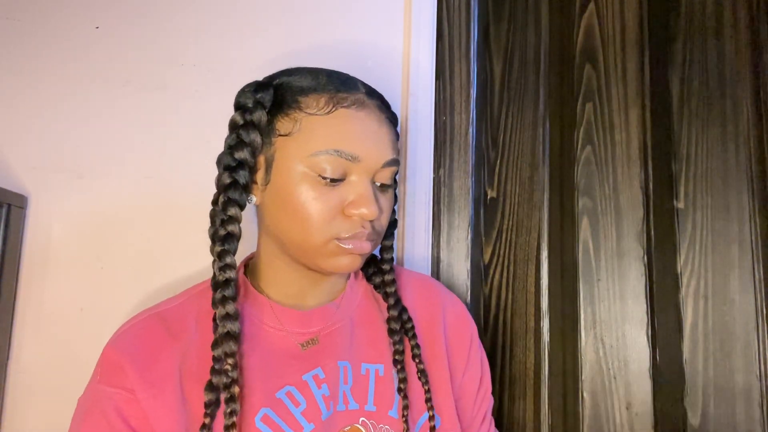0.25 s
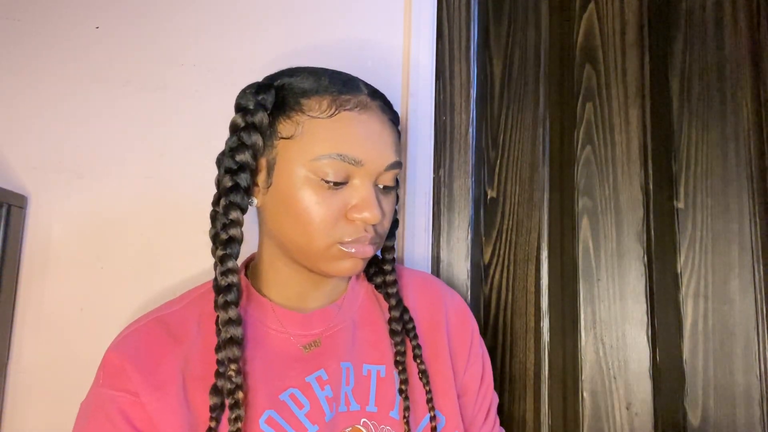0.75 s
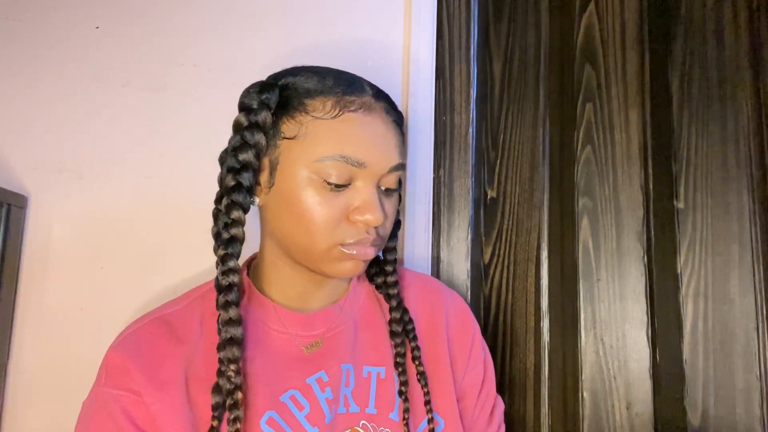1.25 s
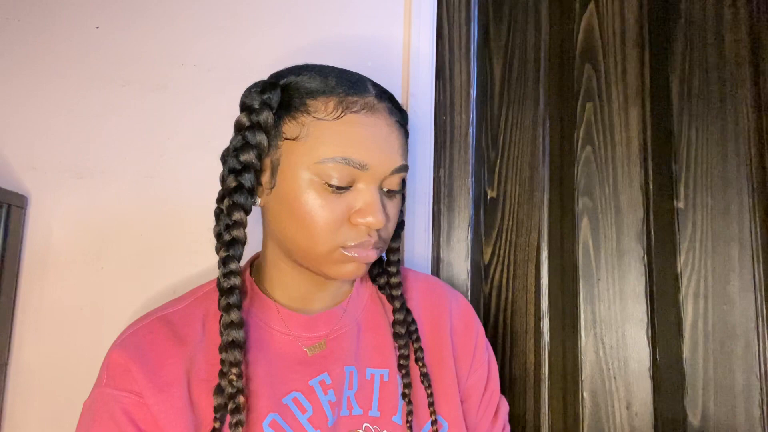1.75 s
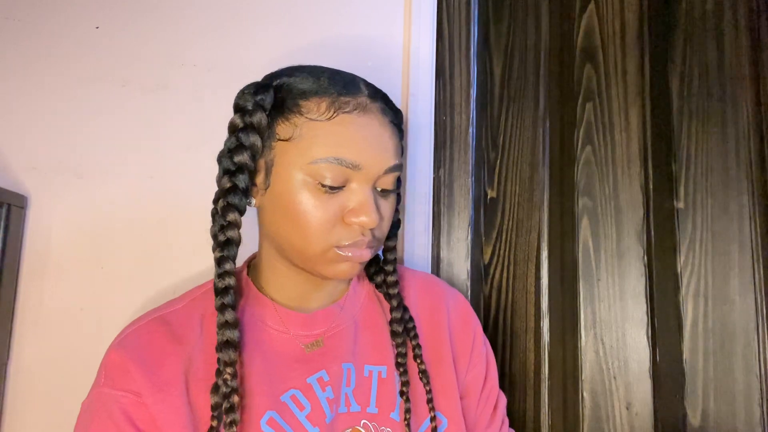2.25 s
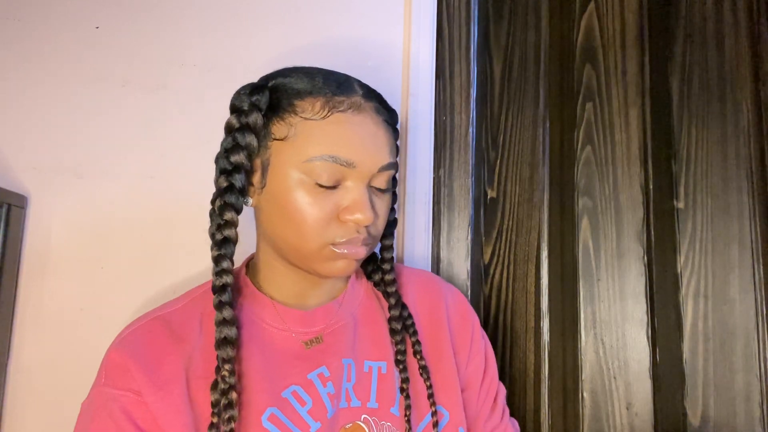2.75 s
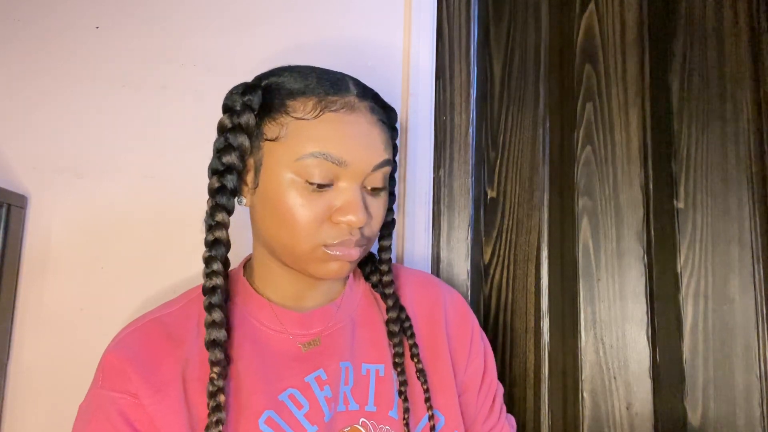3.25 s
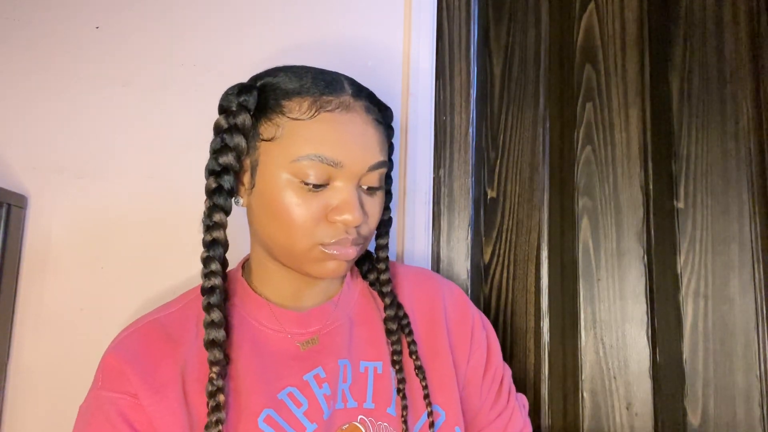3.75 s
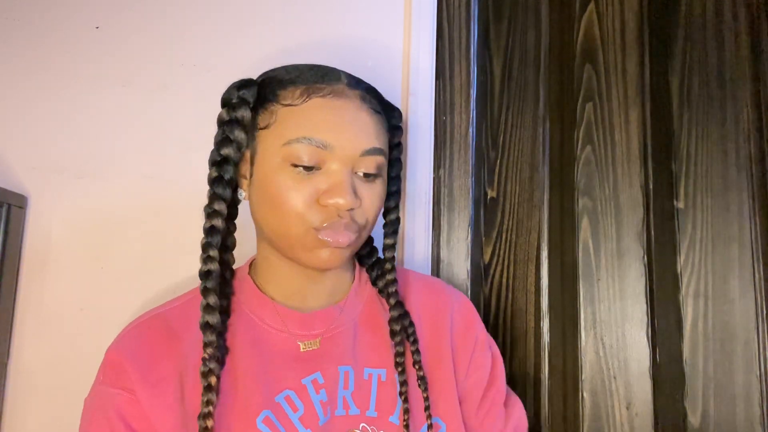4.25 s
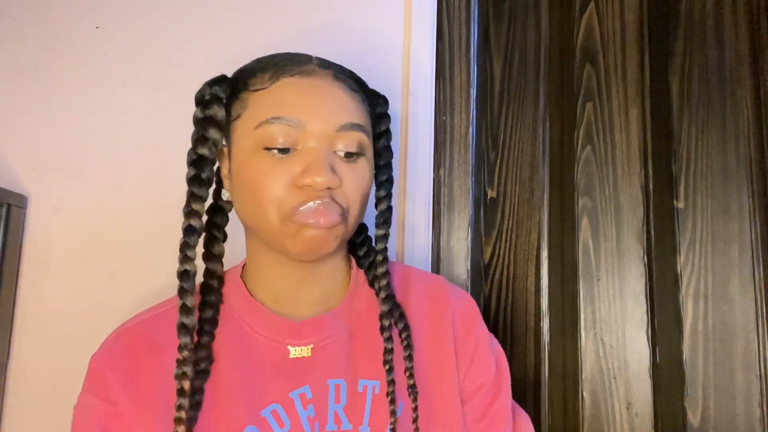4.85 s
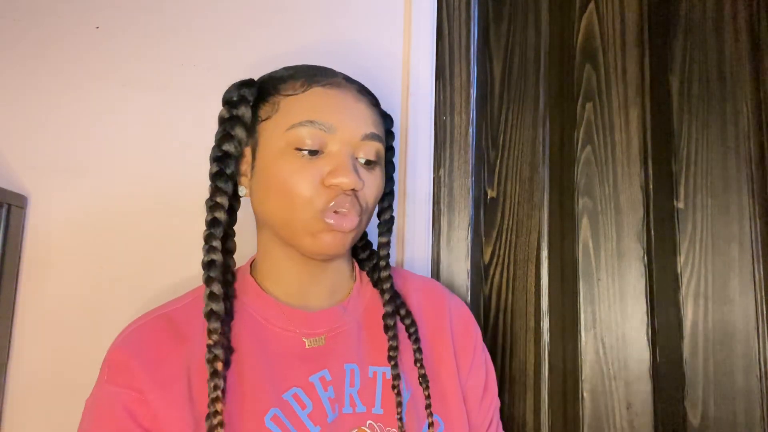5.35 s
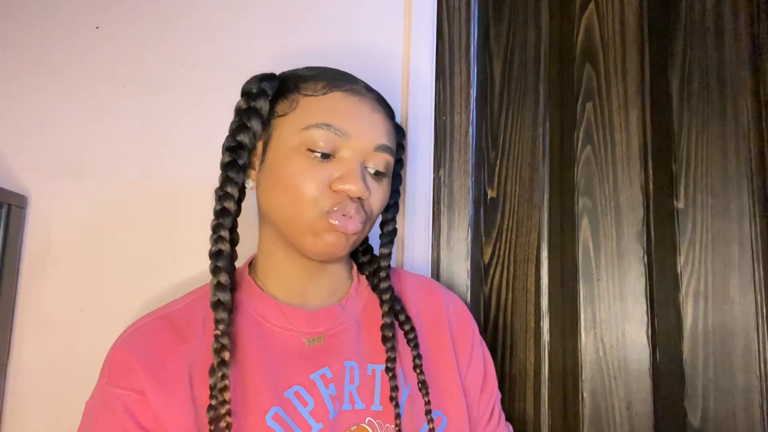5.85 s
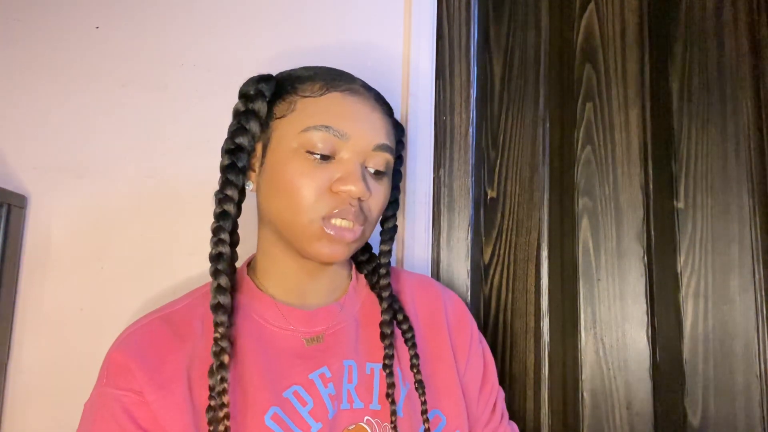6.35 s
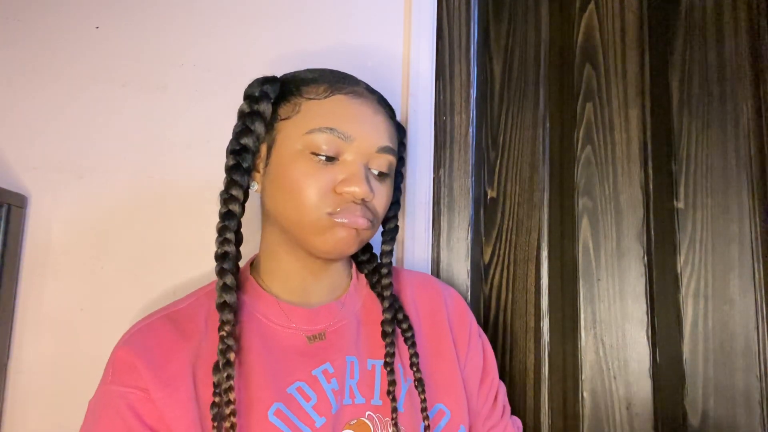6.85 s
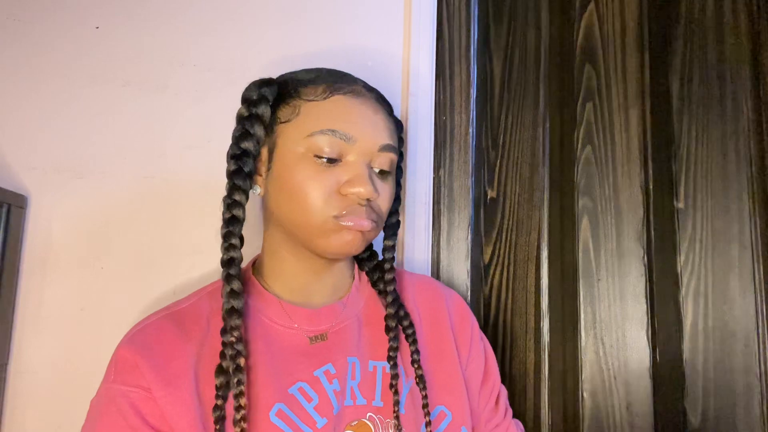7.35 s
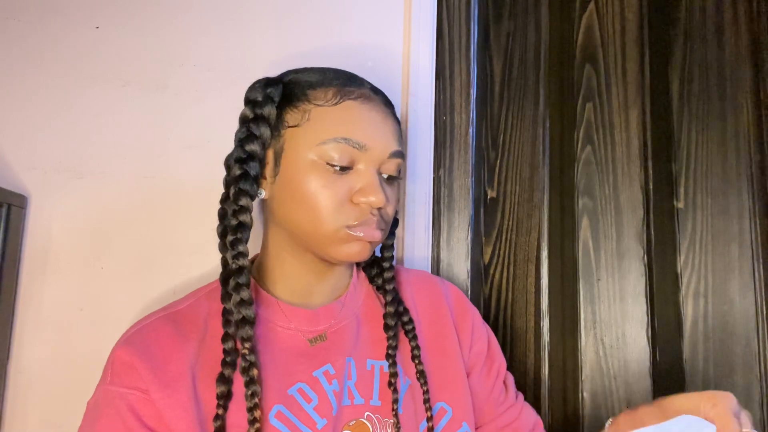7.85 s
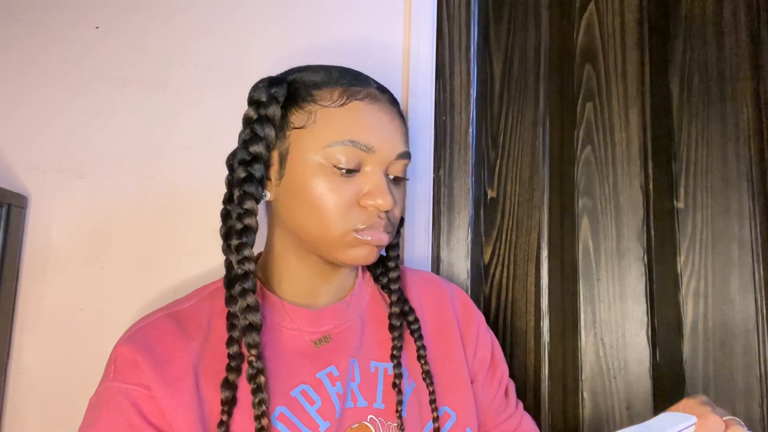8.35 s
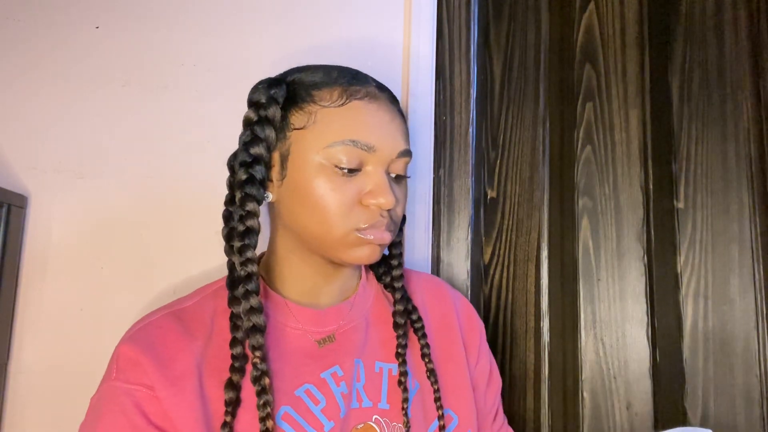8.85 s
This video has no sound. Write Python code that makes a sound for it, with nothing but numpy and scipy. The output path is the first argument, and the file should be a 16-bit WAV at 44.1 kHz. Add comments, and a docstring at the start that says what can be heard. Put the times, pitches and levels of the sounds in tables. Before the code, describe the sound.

Close up, a small cardboard box is tapped, rubbed and opened by hand, light rustles giving way to hard hollow knocks and brief squeaks.

```python
"""A small cardboard box is turned over and opened by hand, close to two microphone ports in a small room.
It begins with knocks (short forces exciting card resonances) and sliding strokes (stick-slip noise).
Lighter snaps and hissing strokes lead, from 3 s on, to much harder knocks among rubbing.
A tight fit judders (an unsteady sine) at 2.9 s, squeaks and groans from 5.4 to 6.5 s, and groans on to the end.
Each sound is followed by its room decay (shaped noise echoes); faint room noise lasts throughout."""
import sys
import numpy as np
from scipy import signal
from scipy.fft import rfft, irfft, next_fast_len
from scipy.io import wavfile
from scipy.ndimage import uniform_filter1d

SR = 44100
rng = np.random.default_rng(int(sys.argv[2]) if len(sys.argv) > 2 else 0)


def digitize_waveform(pressure):
    """Quantize a signal to 16-bit integers and store it at the path in sys.argv[1].

    Rows of a 2-D input are taken as channels; values are limited to [-1, 1].
    """
    field = np.atleast_2d(pressure).T
    bounded = np.clip(field, -1, 1)
    quanta = np.round(bounded * 32767).astype(np.int16)
    wavfile.write(sys.argv[1], SR, quanta)


N = 401751
TIME = np.arange(N) / SR

# Knocks and flap snaps: t/s, hollow body level/dB, thud level/dB and crack level/dB relative to
# the first level column, struck panel f/Hz, crush decay/ms
KNOCK_EVENTS = [(0.112, -30, -7, -19, 430, 3.5), (0.126, -30, -7, -9, 466, 5.7),
                (0.159, -25, -23, -16.5, 830, 3.7), (0.374, -37, -9, -27, 406, 4.9),
                (0.46, -41, -8.5, -15, 410, 2.2), (0.593, -38.5, -19, -16, 450, 8),
                (0.66, -42.5, -13, -18, 625, 1.2), (0.745, -41.5, -9, -27, 640, 10),
                (0.783, -41, -27, -17.5, 390, 5.4), (0.949, -48, -16, -18, 375, 2.4),
                (0.985, -55, 4, 1, 550, 3.3), (1.514, -60, -13, 7, 2030, 2.5),
                (1.68, -41.5, -17, -3, 540, 28.4), (1.952, -33, -12, 0.5, 490, 0.99),
                (2.09, -42, -21, -8.5, 630, 5.1), (2.203, -47.5, -32, -16, 420, 2.8),
                (2.372, -56, -7.5, -15, 1030, 3), (2.432, -60, -9, 1.5, 750, 0.88),
                (2.53, -58, -17, -11.5, 1510, 5.5), (2.752, -54.5, -8, 11, 375, 0.89),
                (2.7736, -46, -31, -1, 390, 1.9), (2.7885, -48, -24, 7, 402, 1.5),
                (2.805, -38, -30, -10, 395, 1.8), (3.084, -18, -20.5, -8, 436, 5.1),
                (3.212, -41, -27, -9, 495, 3.5), (3.247, -41, -37, -10, 504, 12),
                (3.448, -60.5, -7, 5, 427, 1.4), (3.491, -51.5, -10, 2, 810, 2.1),
                (3.529, -15, -11, -8, 580, 2.8), (3.543, -22.5, -3.5, -20, 275, 2.7),
                (3.897, -37.5, -16.5, -26.5, 663, 2.7), (4.065, -52, -4.5, -17, 436, 3.2),
                (4.352, -36.5, -2, -17, 309, 15), (4.734, -39, -13.5, -18, 477, 69),
                (4.763, -15.5, -5, -16.5, 653, 3.9), (4.775, -15.5, -18, -17.5, 187, 4.3),
                (4.841, -25.5, -9.5, -24.5, 332, 2.6), (5.052, -26, -6, -10, 610, 9),
                (5.062, -30.5, -29, -38, 234, 2.23), (5.22, -47, -25, -13.5, 284, 1.4),
                (5.401, -40, -12.5, -58, 545, 1.4), (5.412, -36.5, 1, -5.5, 2770, 1.8),
                (5.418, -45, -7, -24, 1550, 1.2), (5.47, -38, -24, -49, 343, 3.5),
                (5.645, -33.5, -5, -20, 362, 8), (5.71, -41, -10.5, -13, 1400, 3.23),
                (6.076, -15.5, -7.5, -18.5, 218, 6.3), (6.091, -17, -15, -48, 588, 3.7),
                (6.279, -36.5, -9, -25, 483, 1.8), (6.309, -39.5, -6, -25, 425, 4),
                (6.355, -31, -6.5, -23, 603, 2.6), (6.485, -30, -11, -10.5, 371, 1.1),
                (6.753, -34.5, -5.5, -11, 353, 1.4), (6.874, -43.5, -12, -17, 950, 3),
                (6.914, -44.5, -15, -16.5, 1010, 4.7), (7.226, -31.5, -16, -14.5, 920, 2.6),
                (7.288, -45.5, -13, -11.5, 910, 1.7), (7.627, -34.5, -7.5, -19.5, 324, 14),
                (7.986, -27, -4.5, -11, 436, 3.6), (8.077, -11.5, -17, -16, 1134, 2),
                (8.087, -23, -23, -9, 410, 4.3), (8.669, -51.5, -3.5, -25, 393, 6.5),
                (8.928, -51.5, -2.5, -21.5, 422, 16)]
# Resonances of the box: f/Hz, width/Hz, relative level/dB
BOX_MODES = [(72.4, 18, -1), (128, 78, -6.5), (373, 15, 9.5), (498, 180, 8.5), (610, 140, 4),
             (1070, 97, -11.5), (1566, 510, 6), (2067, 290, 5.5)]
# Spectrum of the dry crackle of card fibres: f/Hz, relative level/dB
FIBRE_SPECTRUM = [(1500, 20), (3000, 2), (4700, 4), (6200, 0), (8000, 1), (10000, -4), (12500, -8),
                  (14500, -2.5), (16000, -18)]
# Spectrum of the still room: f/Hz, relative level/dB
AIR_SPECTRUM = [(20, -15.5), (48, 2), (120, -14), (400, -22.5), (900, -22.5), (8000, -34), (15500, -39)]
# Room decay: f/Hz, t60/s
ROOM_DECAY = [(100, 0.28), (1200, 0.16), (7000, 0.21), (15000, 0.073)]
# Room sound against direct sound: f/Hz, level/dB
ROOM_LEVEL = [(100, 0.5), (400, -12), (1200, -3), (2500, -2.5), (6000, -6), (15000, -9)]
# Left-right likeness of diffuse sound: f/Hz, correlation/1
DIFFUSE_CORRELATION = [(100, .55), (2000, .45), (5000, .6), (8500, .9)]
# The microphone pair: f/Hz, phase lead of left/rad, left minus right level/dB
PORT_DIFFERENCES = [(40, 0, -1.5), (340, -.5, -2), (600, -2.1, -3.5), (1100, -1.3, -1.5),
                    (2300, -2.9, -1.5), (4200, -6.2, 0), (5500, -8.2, 0), (7700, -6.4, -.5),
                    (8500, -6.1, 0), (10400, -3.1, 0), (12200, -.2, 0), (13600, .2, 0), (15000, 3, 0)]
# Registers thud, hollow body, flaps, fibres: lower f/Hz, upper f/Hz
REGISTER_EDGES = [(55, 280), (280, 1000), (1000, 3000), (3000, 17000)]
# Judders of a tight fit: t/s, level/dB, mean f/Hz, length/ms
JUDDER_EVENTS = [(2.895, -47, 387, 18.5), (5.413, -30, 2680, 5.6), (6.353, -24.5, 2132, 12.4),
                 (6.354, -27, 372, 17.5), (6.366, -31, 585, 27), (6.374, -29, 357, 24),
                 (6.456, -44, 3770, 37), (7.124, -50, 353, 56), (8.256, -46.5, 408, 40),
                 (8.752, -49.5, 382, 137)]
# Strokes of card on card or paper: start t/s, length/s, drone level/dB,
# rumble level/dB and hiss level/dB relative to the drone
STROKE_EVENTS = [(0.13, 0.16, -46.5, -14, -10.5), (0.327, 0.11, -45.5, -12, -14.5),
                 (.42, 0.49, -54, -17, -11), (0.55, 0.067, -41.5, -19, -16), (0.796, 0.08, -50.5, -3, -19),
                 (0.895, 0.086, -47.5, -8.5, -13.5), (0.97, 0.44, -60.5, -12, -1.5),
                 (1.176, 0.12, -49, -13.5, -5.5), (1.28, 0.28, -82.5, -15, 14),
                 (1.476, 0.047, -69, -27, 8.5), (2.06, 0.31, -62.5, -7.5, 0), (2.314, 0.77, -90, -18, 20.5),
                 (2.719, 0.15, -67, -29, 12), (2.833, 0.12, -71, -27, 11), (3.088, 0.16, -48, -28, -8.5),
                 (3.309, 0.097, -55.5, -14.5, -11.5), (3.56, 0.19, -55, -10, -14.5),
                 (3.75, 0.33, -65.5, -2.5, 1.5), (4.455, 0.3, -65, 4.5, -5), (4.77, 0.07, -47, -8, -16.5),
                 (4.814, 0.12, -65, 18.5, -31), (5.055, 0.13, -43, -2.5, -14.5),
                 (5.123, 0.077, -39, -5.5, -19), (5.21, 0.22, -52.5, -1, -12),
                 (5.323, 0.099, -38.5, -22, -24), (5.428, 0.2, -56, -1.5, -15),
                 (5.651, 0.087, -44.5, -10, -17), (5.762, 0.14, -52.5, -2.5, -17.5),
                 (5.887, 0.19, -46, -8, -12), (6.064, 0.13, -38, -30, -5.5), (6.17, 0.15, -52, -6, -7),
                 (6.276, 0.43, -59, -0.5, -3), (6.446, 0.12, -41.5, -16.5, -1.5),
                 (6.512, 0.2, -60, -18, -6.5), (7.053, 0.045, -51, -15, -4),
                 (7.098, 0.26, -56.5, -10, -6.5), (7.347, 0.22, -69.5, 5, 8), (7.478, 0.16, -57, -9, 0.5),
                 (7.617, 0.13, -49.5, -6.5, -6.5), (7.68, 0.27, -56.5, -9.5, -6.5),
                 (7.895, 0.46, -51, -8.5, -14), (8.075, 0.086, -27.5, -26, -13.5),
                 (8.313, 0.19, -73, -3, 5.5), (8.516, 0.29, -71, 3.5, 7.5), (8.748, 0.22, -57, -14, -25.5),
                 (8.903, 0.22, -61, -0.5, -11.5)]
# Hands that barely stir between strokes: rumble level/dB, drone level/dB, hiss level/dB
REST_LEVELS = (-88.5, -77.5, -100)
# Grip shifts to another panel: t/s, central f/Hz of that panel
GRIP_SHIFTS = [(0, 426), (.545, 590), (.89, 401), (5.05, 710), (5.42, 432), (5.745, 251), (6.07, 409),
               (8.08, 1104), (8.235, 400)]

# Above this pitch a panel is stiff and the hollow body weakens
STIFF_HZ, STIFF_DB_PER_OCTAVE = 604, 5
# Flaps in a knock: level at a crack of 0 dB, and growth in dB per dB of crack
FLAP_DB, FLAP_FOLLOWS = 5, 0.74
# Flaps in a stroke: level at a firm stroke, level of that stroke, growth in dB per dB
BEND_DB, FIRM_DB, BEND_GROWS = -48.5, -49, 1.177
# Arch of a stroke: how early it peaks (under 1 = early), and how pointed it is
STROKE_SKEW, STROKE_POINT = 0.68, 0.82
# Wander of the rubbed panel's pitch: spread of its random targets, and targets per second
WANDER_OCTAVES, WANDER_PER_S = 0.2, 55
WHISPER_HZ = 6500  # fibres rasp below and whisper above
AIR_DB = -71
CUTOFF_HZ = 15500
REGISTERS = [signal.butter(3, edges, "band", fs=SR, output="sos") for edges in REGISTER_EDGES]


def knocks(click=0.46, rise_ms=0.55, swell_db=-16, swell_ms=2.7, panel_db=-4, panel_q=7.3,
           hand_damping_hz=20, body_db=-2, skirt_db=-10, low_cut_hz=150, blow_ms=6):
    """Impulse response: soft noise swells just before each click and crush; box and panel answer."""
    lead = SR // 100
    ms = np.arange(-lead, SR // 5) / SR * 1000
    after = np.maximum(ms, 0)
    swell = from_db(swell_db) * np.exp(-np.abs(ms) / swell_ms)
    light_box = signal.butter(2, low_cut_hz, "high", fs=SR, output="sos")
    out = np.zeros(N + len(ms))
    noises = rng.standard_normal((len(KNOCK_EVENTS), len(ms)))
    for (s, db, thud, crack, panel_hz, crush_ms), noise in zip(KNOCK_EVENTS, noises):
        crush_envelope = (1 - np.exp(-after / rise_ms)) * np.exp(-after / max(crush_ms, .5))
        # squaring with the sign kept makes the noise crackle
        crush = noise * np.abs(noise) * (swell + crush_envelope)
        force = crush / np.linalg.norm(crush)
        force[lead] += click
        force = signal.sosfilt(light_box, force)

        ring = resonate(force, panel_hz, panel_hz / panel_q + hand_damping_hz)
        ring = resonate(ring, panel_hz, panel_hz)
        parts = [ring] + box(force, skirt_db)
        body = body_db - kept_db(panel_hz)
        levels = [panel_db, thud, body, FLAP_DB + FLAP_FOLLOWS * crack, crack]
        blow = sum(from_db(db + rel) * part / np.linalg.norm(part) for part, rel in zip(parts, levels))
        start = round(s * SR) - lead
        # each part's level is its rms as if spread over blow_ms
        out[start:start + len(ms)] += blow * np.sqrt(blow_ms * SR / 1000)
    return out[:N]


def box(force, skirt_db):
    """Modal superposition: a force on the card is heard as thud, hollow body, flaps and fibres."""
    panels = from_db(skirt_db) * force
    for hz, width_hz, db in BOX_MODES:
        panels = panels + from_db(db) * resonate(force, hz, width_hz)
    fibres = colour(force, lambda hz: from_db(at_hz(FIBRE_SPECTRUM, hz)))
    return [signal.sosfilt(sos, part) for sos, part in zip(REGISTERS, [panels, panels, panels, fibres])]


def kept_db(panel_hz):
    """Stiffness: a small, stiff panel keeps its vibration and passes less to the hollow body."""
    return STIFF_DB_PER_OCTAVE * np.maximum(np.log2(panel_hz / STIFF_HZ), 0)


def rubbing(slips_per_s=480, slip_db=4, smooth=0.17, grit_per_s=4500, grit_db=2.5, grit=1.1,
            shake_db=5, shake_rate=60, hiss_shake_db=3.5, panel_db=-4, panel_q=4, body_db=-2,
            body_share=0.52, rasp_db=-4, rasp_follows=0.045, whisper_db=-2, skirt_db=-14):
    """Stick-slip friction: catches knock on box and panel; fine fibre grit adds rumble and hiss."""
    rumble, drone, hiss, panel_hz = stroke_controls()
    shake = drift(shake_rate)
    force = catches(slips_per_s, slip_db) + smooth * rng.standard_normal(N)
    force = force * from_db(shake_db * shake)

    wandering_hz = panel_hz * 2 ** (WANDER_OCTAVES * drift(WANDER_PER_S))
    panel = glide(glide(force, wandering_hz, panel_q), wandering_hz, panel_q)
    _, body, flaps, _ = box(force, skirt_db)
    fine_grit = grit * rms_one(catches(grit_per_s, grit_db)) * from_db(hiss_shake_db * shake)
    thud, *_, fibres = box(force + fine_grit, skirt_db)
    rasp, whisper = [signal.sosfilt(signal.butter(3, WHISPER_HZ, kind, fs=SR, output="sos"), fibres)
                     for kind in ("low", "high")]

    # both the body and the sliding surface drive the flaps
    bending = hiss + body_share * (drone - hiss)
    flap_level = BEND_DB + BEND_GROWS * (bending - FIRM_DB)
    # a heavy stroke rasps, a light one whispers
    rasp_level = hiss + rasp_db + rasp_follows * (drone - hiss)
    body_level = drone + body_db - kept_db(panel_hz)
    levels = [rumble, drone + panel_db, body_level, flap_level, rasp_level, hiss + whisper_db]

    def even(part):
        """Power normalization: the hand's pressure sets the loudness, whichever panel rings."""
        return part / np.sqrt(uniform_filter1d(part ** 2, size=SR // 12) + 1e-12)

    parts = [thud, panel, body, flaps, rasp, whisper]
    return sum(from_db(level) * even(part) for level, part in zip(levels, parts))


def stroke_controls():
    """Power addition: arched strokes and rest give rumble, drone and hiss in dB; grips give pitch."""
    power = from_db(REST_LEVELS)[:, None] ** 2 * np.ones(N)
    for s, length_s, db, rumble, hiss in STROKE_EVENTS:
        span = slice(*np.searchsorted(TIME, [s, s + length_s]))
        along = np.clip((TIME[span] - s) / length_s, 0, 1)
        speed = np.abs(np.sin(np.pi * along ** STROKE_SKEW)) ** STROKE_POINT
        power[:, span] += (from_db([[db + rumble], [db], [db + hiss]]) * speed) ** 2
    shifts, panel_hz = np.transpose(GRIP_SHIFTS)
    return *(10 * np.log10(power)), panel_hz[np.searchsorted(shifts[1:], TIME)]


def catches(per_s, spread_db):
    """Random point process: clicks of either sign at random moments, most of them small."""
    sizes = from_db(spread_db * np.minimum(rng.exponential(1, N), 3.5))
    signed = sizes * rng.choice([-1, 1], N)
    return signed * (rng.random(N) < per_s / SR)


def glide(x, hz, q, size=256):
    """Time-varying resonance: one complex pole moves, block by block, with its state carried over."""
    out, state = np.zeros(N), np.zeros(1, complex)
    for i in range(0, N, size):
        pole = np.exp((2j - 1 / q) * np.pi * hz[i] / SR)
        ring, state = signal.lfilter([1 - abs(pole)], [1, -pole], x[i:i + size], zi=state)
        out[i:i + size] = 2 * ring.real
    return out


def judders(rough=2.15, rough_per_s=900, uneven=0.33):
    """Stick-slip oscillation: uneven slips drive an unsteady pitch, strongest as the grip gives way."""
    out = np.zeros(N)
    seconds = np.arange(SR // 5) / SR
    chances = rng.standard_normal((len(JUDDER_EVENTS), 400))
    for (s, db, hz, length_ms), chance in zip(JUDDER_EVENTS, chances):
        along = seconds * 1000 / length_ms
        envelope = np.clip(along * 10, 0, 1) * np.sqrt(np.clip(2 - 2 * along, 0, None))
        index = np.arange(len(chance))
        pitch = hz + rough * np.sqrt(hz) * np.interp(seconds * rough_per_s, index, chance)
        cycles = np.cumsum(pitch) / SR
        slips = 1 + uneven * np.interp(cycles, index, chance[::-1])
        slips = slips / np.hypot(1, uneven)
        start = round(s * SR)
        out[start:start + len(seconds)] += from_db(db) * envelope * slips * np.sin(2 * np.pi * cycles)
    return out


def room(x, first_echo_s=0.0053, early_db=5, early_s=0.0063, count=14):
    """Reverberation: early echoes of table and near walls, then a tail, varied as the box moves."""
    t = np.arange(2 ** 14) / SR
    onset = np.clip(t / first_echo_s - .5, 0, 1)
    shape = onset * (1 + from_db(early_db) * np.exp(-t / early_s))
    centres = np.geomspace(80, 15000, 9)
    decays = shape * from_db(-60 * t / at_hz(ROOM_DECAY, centres)[:, None])
    decays *= (from_db(at_hz(ROOM_LEVEL, centres)) / np.linalg.norm(decays, axis=1))[:, None]

    def bands(hz):
        """Overlapping bands: triangles on a log-frequency axis, summing to one."""
        return np.array([at_hz(np.c_[centres, share], hz) for share in np.eye(len(centres))])

    out = np.zeros((2, N + len(t)))
    places = np.linspace(0, TIME[-1], count)  # seconds at which each response is at its fullest
    for place, share in zip(places, np.eye(count)):
        response = np.sum(colour(diffuse_noise(len(t))[:, None], bands) * decays, axis=1)
        near = np.flatnonzero(np.abs(TIME - place) < places[1])
        # equal-power crossfade between neighbouring responses
        sent = x[near] * np.sqrt(np.interp(TIME[near], places, share))
        echoes = signal.fftconvolve(sent[None], response, axes=1)
        out[:, near[0]:near[0] + echoes.shape[1]] += echoes
    return x + out[:, :N]


def room_air():
    """Stationary diffuse noise: the still room, with a fixed spectrum and level."""
    air = rms_one(colour(diffuse_noise(N), lambda hz: from_db(at_hz(AIR_SPECTRUM, hz))))
    return from_db(AIR_DB) * air


def diffuse_noise(size):
    """Partial coherence: mid and side noise, as stereo sound arriving from all sides."""
    mid, side = rng.standard_normal((2, size))

    def alike(hz):
        """Interchannel correlation, held between 0 and 1."""
        return np.clip(at_hz(DIFFUSE_CORRELATION, hz), 0, 1)

    mid = colour(mid, lambda hz: np.sqrt((1 + alike(hz)) / 2))
    side = colour(side, lambda hz: np.sqrt((1 - alike(hz)) / 2))
    return np.array([mid + side, mid - side])


def resonate(x, hz, width_hz):
    """Damped resonance: a pole pair of given bandwidth, with gain 1 on top."""
    r = np.exp(-np.pi * width_hz / SR)
    zeros = np.array([1, 0, -1]) * (1 - r * r) / 2
    poles = [1, -2 * r * np.cos(2 * np.pi * hz / SR), r * r]
    return signal.lfilter(zeros, poles, x)


def colour(x, gain_at):
    """Linear filtering: the spectrum is multiplied by a gain given as a function of frequency."""
    size = next_fast_len(x.shape[-1] + 2048)
    spectrum = rfft(x, size) * gain_at(np.fft.rfftfreq(size, 1 / SR))
    return irfft(spectrum, size)[..., :x.shape[-1]]


def at_hz(points, hz, axis=1):
    """Logarithmic frequency scale: a table column is interpolated along log f."""
    table = np.array(points, float)
    return np.interp(np.log(np.maximum(hz, 1)), np.log(table[:, 0]), table[:, axis])


def drift(rate):
    """Slow random variation: straight lines join targets of spread 1, rate of them per second."""
    targets = rng.standard_normal(4000)
    return np.interp(TIME * rate, np.arange(len(targets)), targets)


def from_db(db):
    """Decibel definition: level to amplitude gain."""
    return 10 ** (np.asarray(db) / 20)


def rms_one(x):
    """Effective value: scale to rms 1."""
    return x / np.sqrt(np.mean(x ** 2) + 1e-30)


def scene():
    """Superposition: the handled box with its room sound, above the noise of the still room."""
    air = room_air()
    return room(knocks() + rubbing() + judders()) + air


def record(dry, top=1.0):
    """Two-port reception: phase and level differ; the highest peaks are rounded, the top is cut."""
    sides = np.array([[.5], [-.5]])  # left and right each take half the difference

    def port_response(hz):
        """Complex transfer function of each port."""
        phase = np.exp(1j * sides * at_hz(PORT_DIFFERENCES, hz))
        return phase * from_db(sides * at_hz(PORT_DIFFERENCES, hz, axis=2))

    pair = colour(dry, port_response)
    pair = pair / (1 + (pair / top) ** 6) ** (1 / 6)
    return signal.sosfiltfilt(signal.butter(16, CUTOFF_HZ, fs=SR, output="sos"), pair)


dry = scene()
out = record(dry)
digitize_waveform(out)
```